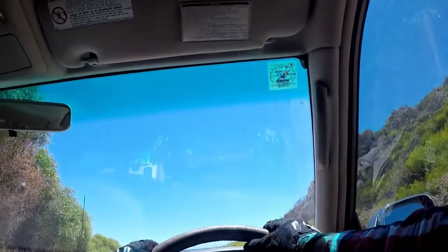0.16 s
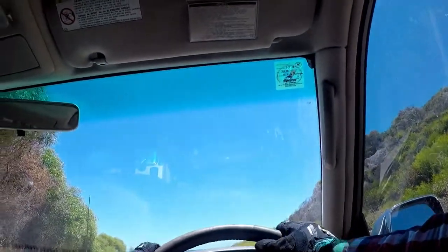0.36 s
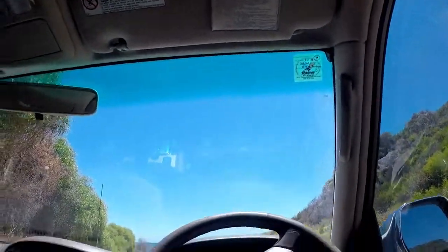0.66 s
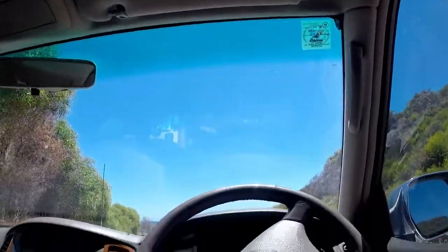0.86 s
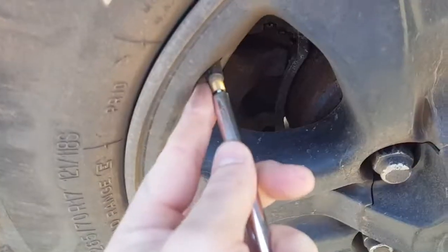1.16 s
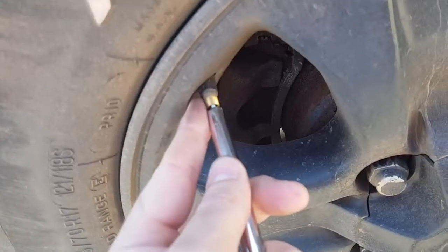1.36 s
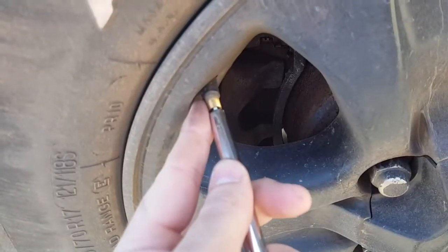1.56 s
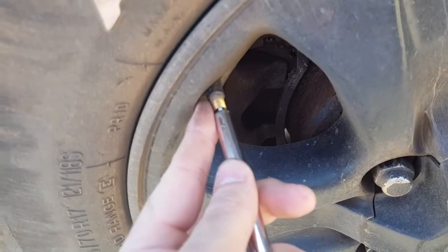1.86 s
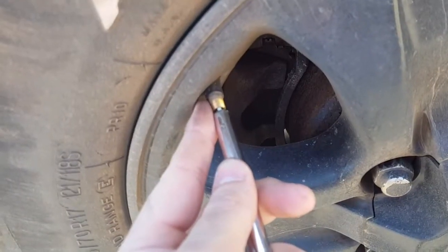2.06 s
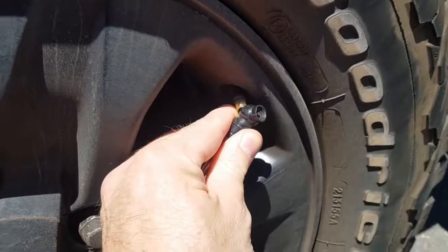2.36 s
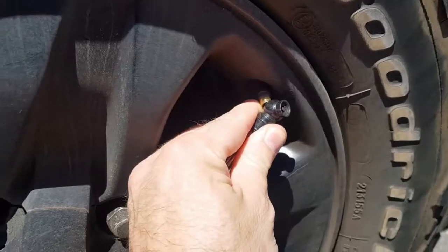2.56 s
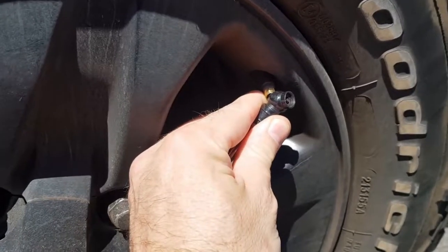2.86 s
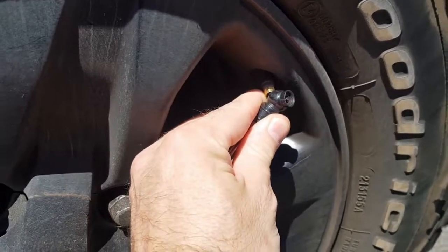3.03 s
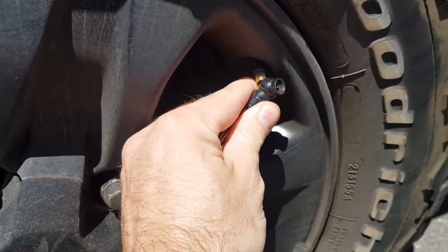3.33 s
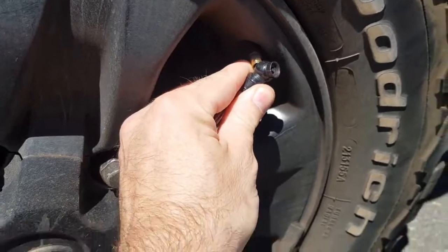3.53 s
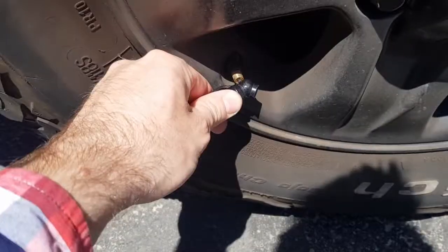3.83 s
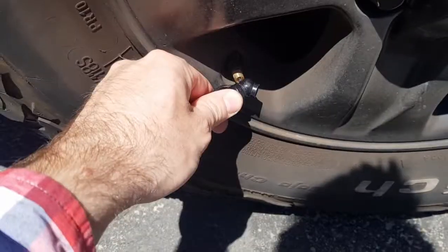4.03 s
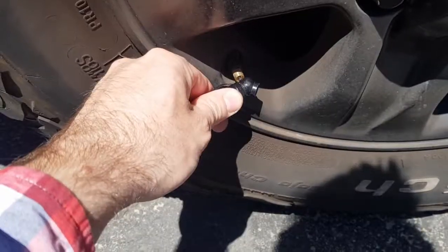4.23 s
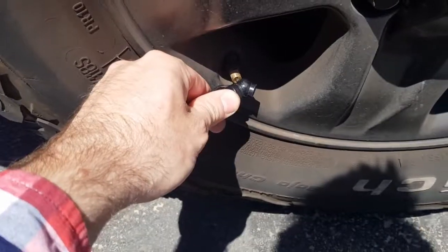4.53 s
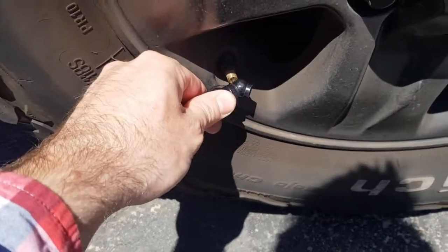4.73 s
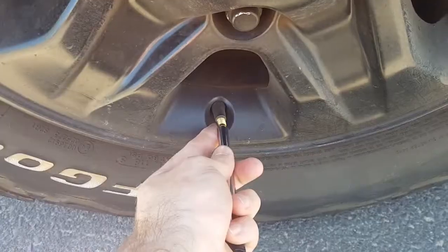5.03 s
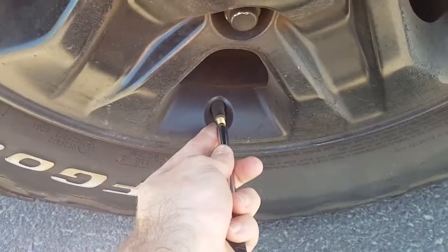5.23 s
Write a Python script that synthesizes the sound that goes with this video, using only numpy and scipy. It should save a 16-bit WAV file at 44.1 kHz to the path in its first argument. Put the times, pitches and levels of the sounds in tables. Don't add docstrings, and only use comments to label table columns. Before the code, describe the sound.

Muffled low engine rumble with several bumps and short plastic rattles, heard from inside the cab on a stereo camera microphone. Then sudden, continuous, sharp air hiss from a deflating tyre, recorded very close in open air. It runs to the end in four shots split by tiny silent dips, each a little different in tone and stereo spread, over light wind rumble.

```python
import sys
import numpy as np
from scipy import signal
from scipy.fft import rfft, irfft, next_fast_len
from scipy.io import wavfile
from scipy.ndimage import uniform_filter1d, map_coordinates

SR = 44100
rng = np.random.default_rng(int(sys.argv[2]) if len(sys.argv) > 2 else 0)


def materialize(psi):
    bounded = np.clip(np.atleast_2d(psi).T, -1, 1)
    quanta = np.round(bounded * 32767).astype(np.int16)
    wavfile.write(sys.argv[1], SR, quanta)


def volts(x):
    e = np.asarray(x, float) / 20
    return 10 ** e


N = 237654

CUTS = [
    1.0844,
    2.353,
    3.6212,
    4.888,
]


def unit(x):
    return x / np.sqrt(np.mean(x ** 2) + 1e-20)


def along(points, hz):
    f, v = np.transpose(points)
    return np.interp(np.log(hz + 1), np.log(f + 1), v)


def curves(rows):
    s, *cols = np.transpose(rows)
    return [np.interp(np.arange(N) / SR, s, c) for c in cols]


def wobble(rate):
    knots = rng.standard_normal(int(N * rate / SR) + 4)
    return map_coordinates(knots, [np.arange(N) * rate / SR])


def filtered(x, response):
    m = next_fast_len(N + SR // 4)
    return irfft(rfft(x, m) * response(np.fft.rfftfreq(m, 1 / SR)), m)[..., :N]


def noise_pair(alike, patchy_db):
    z = signal.stft(rng.standard_normal((2, N)), nperseg=256)[2]
    patches = uniform_filter1d(rng.standard_normal(z.shape[1:]), size=4, axis=0)
    patches = uniform_filter1d(patches, size=20, axis=1)
    pair = signal.istft(z * volts(patchy_db * unit(patches)), nperseg=256)[1][:, :N]

    def mid_side(hz):
        angle = np.arccos(np.clip(along(alike, hz), -1, 1)) / 2
        return np.array([np.cos(angle), np.sin(angle)])

    mid, side = filtered(pair, mid_side)
    return np.array([mid + side, mid - side])


def between(start, end):
    t = np.arange(N) / SR
    return np.clip((t - start) / 0.0013, 0, 1) * np.clip((end - t) / 0.0024, 0, 1)


def cab():
    # start_s, boom_db, body_db, creak_db, grit_db
    road_levels = [(0.0, -22.5, -43, -50, -50), (0.008, -25.5, -42, -54.5, -60.5),
                   (0.33, -29, -43, -60, -73), (0.436, -21.5, -41, -53, -55.5),
                   (0.486, -25.5, -38, -52.5, -55), (0.628, -18.5, -40, -48, -53.5),
                   (0.676, -22, -34.5, -46.5, -50), (0.866, -24, -42, -52, -53.5),
                   (0.974, -20.5, -49, -51, -50.5), (1.024, -31.5, -40, -49, -51.5),
                   (1.076, -22.5, -37, -50, -54), (1.08, -24, -50, -48, -50)]
    # start_s, pitch_hz, level_db
    firing_curve = [(0.0, 46.35, -27), (0.14, 45.4, -25.5), (0.182, 46.1, -30), (0.212, 46.55, -26),
                    (0.574, 46.93, -27), (0.592, 46.65, -25.5), (0.742, 46.14, -30), (1.08, 46.94, -25)]
    # freq_hz, level_db_per_hz
    boom_colour = [(8.8, -40), (15, -4), (37, -2.5), (54, -1.5), (70, -3.5), (113, -1), (173, -9.5),
                   (209, -19), (300, -25), (390, -47), (660, -120)]
    body_colour = [(110, -34.5), (180, -1.5), (209, -11.5), (361, -9.5), (402, -13), (646, -11),
                   (801, -24.5), (898, -17.5), (1000, -22), (1300, -57), (2200, -120)]
    creak_colour = [(500, -45), (850, -14), (1110, -7), (1190, -8), (1830, -10.5), (2940, -16), (3200, -26),
                    (4160, -48), (7040, -120)]
    grit_colour = [(1650, -45), (2800, -17.5), (3300, -5), (3800, -8.5), (4200, -8), (4900, -12.5),
                   (5800, -7), (6600, -11.5), (7400, -15), (10000, -24), (13000, -40), (15500, -60)]
    draught_colour = [(1000, -10.5), (2500, -5), (6000, -1), (10500, -5), (13000, -9), (15500, -32)]
    # freq_hz, left_right_likeness (0-1)
    cab_alike = [(40, 0.98), (120, .9), (250, 1), (690, 0.51), (1030, 0.42), (3100, 0.64), (3790, 0.97),
                 (5860, 0.52), (6550, .05), (11020, 1), (11710, .35), (14130, .1)]
    # freq_hz, left_minus_right_db
    cab_lean = [(60, 0), (130, -1.5), (290, -6), (640, -3.5), (1410, -1.5), (3100, 1.5), (6820, -1),
                (15000, 1)]

    boom_db, body_db, creak_db, grit_db = curves(road_levels)
    pitch_hz, firing_db = curves(firing_curve)
    phase = 2 * np.pi * np.cumsum(pitch_hz * (1 + 0.031 * wobble(14.4))) / SR
    firing = volts(firing_db + 1.5 + 1.2 * wobble(12)) * np.sin(phase)
    once_a_cycle = 1 + 0.17 * np.cos(phase)
    out = firing + jolts()
    layers = [
        (boom_db - 2, boom_colour, 0.8),
        (body_db - 1.5, body_colour, 0.8),
        (creak_db, creak_colour, 1.5),
        (grit_db - 1, grit_colour, 1.2),
        (-62, draught_colour, 0.5),
    ]
    for level_db, colour, lumps_db in layers:
        layer = filtered(noise_pair(cab_alike, patchy_db=1.5), lambda f: volts(along(colour, f)))
        out = out + volts(level_db) * unit(layer * once_a_cycle * volts(lumps_db * wobble(25.5)))
    return filtered(out, lambda f: volts(np.outer([0.5, -0.5], along(cab_lean, f))))


def jolts():
    # start_s, peak_db, thump_db, most_shaken_hz, tick_db, t60_s
    bumps = [
        (.114, -39, -4, 1900, -9, .03),
        (.391, -34, 6, 400, -24, .05),
        (.524, -39, 4, 500, -20, .05),
        (.54, -39, 2, 700, -8, .03),
        (.582, -17, 1, 300, -40, .05),
        (.645, -30, 2, 700, -20, .04),
        (.686, -20, -3, 480, -31, .065),
        (.751, -23.5, -14, 560, -21, .08),
        (.937, -26, -5, 400, -27, .08),
        (1.049, -35, 2, 600, -24, .05),
    ]
    # freq_hz, level_db
    trim_modes = [(240, -2), (310, 0), (410, -4), (500, -1), (560, 0), (680, -5), (910, -2), (1110, -2),
                  (1410, -4), (1770, -6), (2060, -6)]

    knock, tick = np.zeros((2, N)), np.zeros(N)
    t = np.arange(SR // 5) / SR
    for s, peak_db, thump_db, shaken_hz, tick_db, t60 in bumps:
        at = slice(round(s * SR), round(s * SR) + len(t))
        fade = volts(peak_db - 60 * t / max(t60, 0.01)) * (1 - np.exp(-t / 0.004))
        knock[:, at] += fade * volts(thump_db) * np.sin(2 * np.pi * 165 * t)
        for hz, mode_db in trim_modes:
            reach_db = mode_db - 7 * abs(np.log2(hz / shaken_hz)) + rng.normal(0, 1.5, size=(2, 1))
            turns = hz * t + 0.11 * rng.standard_normal((2, 1))
            knock[:, at] += fade * volts(reach_db) * np.sin(2 * np.pi * turns)
        tick[at] += fade * volts(tick_db - 4) * rng.standard_normal(len(t))
    bright = lambda f: (1j * f * 4000 / (4500 ** 2 - f * f + 1j * f * 4000)) ** 2
    return knock + filtered(tick, bright)


def valve(wheel):
    # start_s, jet_db, body_db
    flow = [
        [(1.11, -18.5, -8.5), (1.132, -18.5, -9), (2.272, -20, -9.5), (2.32, -20.5, -10)],
        [(2.38, -19, -8.5), (3.524, -18.5, -9), (3.59, -20, -7.5)],
        [(3.65, -18, -9.5), (3.834, -18.5, -9), (4.818, -19, -8), (4.86, -17.5, -8.5)],
        [(4.92, -18, -13), (5.016, -19.5, -11), (5.37, -18.5, -11)],
    ]
    # freq_hz, level_db_per_hz
    jet_colour = [([(340, -29.5), (1890, -23.1), (4130, -14.0), (5000, -15.5), (7750, -25.5), (8100, -38),
                  (9470, -10.5), (9990, -27), (10850, -20.3), (12750, -10), (13090, -10), (15680, -17.5)],
                  [(340, -27.5), (1380, -27), (2240, -27), (5170, -8.2), (5860, -3.5), (7060, -10.5),
                  (8270, -8.5), (10510, -5), (11710, 3), (12400, 2.7), (14130, -2), (15680, -17)]),
                  ([(340, -33.5), (690, -19.5), (1030, -24.5), (2760, -12), (3790, -13), (4650, -9.5),
                  (7410, -28), (8270, -27), (8790, -21.3), (9300, -22), (10160, -15.5), (15680, -13)],
                  [(340, -29.5), (1380, -26.5), (3960, -10), (5510, -7.5), (6030, -5), (6890, -14),
                  (7750, -15.5), (9300, -10.5), (13090, 4.5), (14130, -2.6), (15330, -8), (15680, -23)]),
                  ([(340, -31.5), (3620, -13.5), (4650, -14), (8100, -32), (8440, -25.6), (9300, -20),
                  (9990, -28), (11200, -14), (12230, -9), (12580, -30), (13440, -11), (15680, -13)],
                  [(340, -31), (860, -30), (1210, -23), (1890, -28), (4130, -10.5), (5170, -10),
                  (7580, -17.5), (8440, -7), (11020, 1.65), (11890, 2.6), (12920, -2), (15680, -13)]),
                  ([(340, -26.5), (1030, -30.5), (1890, -24.5), (4310, -18.5), (4650, -19), (7920, -31),
                  (8270, -22), (9130, -23), (10680, -7), (11370, -25), (12580, -8.5), (15680, -15)],
                  [(340, -31), (1030, -32.5), (1550, -27), (2070, -30.5), (5170, -13), (5680, -15),
                  (6030, -9), (7240, -19), (7580, -12.5), (9990, -3.5), (14130, -1.5), (15680, -8)])]
    # delay_ms, gain
    near_echoes = [([(0.63, -0.076), (0.81, -0.07), (1.23, 0.079), (1.28, -0.035), (1.34, 0.08),
                   (1.99, 0.071), (2.06, -0.063)], [(0.63, 0.059), (0.76, 0.07), (0.87, 0.0039),
                   (0.98, 0.0063), (1.42, 0.092), (1.53, 0.075), (1.59, -0.033)]), ([(0.53, 0.021),
                   (0.62, -0.018), (1.19, -0.088), (1.78, -0.0042), (1.85, 0.047), (1.99, 0.074),
                   (2.27, -0.081)], [(0.56, -0.016), (0.71, 0.048), (1.35, 0.063), (1.56, 0.043),
                   (1.67, 0.04), (2.02, -0.051), (2.2, -0.057)]), ([(0.5, -0.12), (0.72, 0.077),
                   (0.8, -0.053), (1.0, 0.079), (1.4, -0.06), (1.52, -0.068), (2.05, 0.087)],
                   [(0.86, -0.053), (1.35, -0.086), (1.42, -0.031), (1.84, -0.017), (1.98, -0.04),
                   (2.29, -0.098), (3.08, -0.073)]), ([(1.03, 0.095), (1.13, -0.06), (1.23, -0.082),
                   (1.45, 0.073), (1.58, 0.068), (1.74, 0.065), (2.24, 0.092)], [(0.55, -0.051),
                   (0.64, -0.059), (0.88, -0.079), (0.96, -0.03), (1.17, -0.06), (1.25, -0.037),
                   (2.72, -0.11)])]
    # freq_hz, left_right_likeness (0-1)
    jet_alike = [
        [(340, 0.27), (2410, 0.23), (2760, 1), (3100, 0.97), (3790, 0.48), (4130, 0.65), (7920, 0.23),
         (8270, 0.22), (13090, 0.46), (14470, 0.11), (14810, 0.2), (15500, 0.28)],
        [(340, 0.39), (690, 0.72), (1380, 0.56), (1720, 0.058), (3100, 0.99), (3790, 1), (4480, 0.65),
         (4820, 0.49), (7240, 0.11), (12060, 0.29), (15160, 0.06), (15500, 0.25)],
        [(340, 0.5), (690, 0.56), (1030, 0.85), (1380, 0.41), (1720, 0.3), (2760, 0.96), (3100, 0.86),
         (4130, 0.55), (7580, 0.034), (10340, 0.35), (10680, 0.75), (15500, 0.47)],
        [(340, 0.57), (1030, 0.43), (1380, 0.66), (1720, 0.32), (6200, 0.75), (7240, 0.19), (7580, 0.08),
         (11020, 0.9), (11370, 0.5), (11710, 0.24), (14810, 0.18), (15500, 0.34)],
    ]
    # freq_hz, phase_rad
    port_lag = [
        [(340, -0.8), (3450, -0.4), (5510, -1.5), (6890, -4.5), (8610, 2), (8960, -6), (12060, -10),
         (13090, -10.5), (14130, -15.5), (15500, -9)],
        [(340, 0.4), (4130, -0.87), (5510, -0.6), (6200, -0.3), (6890, -2.5), (9990, -16.5), (10340, -10.65),
         (11370, -12), (12750, -10.5), (15500, -12.5)],
        [(340, 0.02), (9300, -0.45), (11370, 1), (11710, 0.77), (12060, 0.17), (13780, -1.1), (14470, -1.3),
         (14810, -2.2), (15160, -1.7), (15500, -1.2)],
        [(340, 0.4), (4820, -0.6), (5510, -2.2), (5860, 1), (6200, -5.5), (7240, -7), (7580, -7.5),
         (14470, -17), (14810, -33), (15500, -19.5)],
    ]

    jet_db, body_db = curves(flow[wheel])
    colour, echoes = jet_colour[wheel], near_echoes[wheel]

    def ports(hz):
        left = port(colour[0], echoes[0], hz)
        right = port(colour[1], echoes[1], hz) * np.exp(1j * along(port_lag[wheel], hz))
        return np.array([left, right])

    air = filtered(noise_pair(jet_alike[wheel], patchy_db=0.6), ports)
    body = filtered(air, lambda hz: 1 / (1 + (hz / 7500) ** 8))
    jet = air - body
    unsteady = volts(0.13 * wobble(7) + 0.27 * wobble(30))
    hiss = body * volts(body_db - body_db.mean()) + jet
    return volts(jet_db) * unsteady * hiss / jet.mean(axis=0).std()


def port(colour, echoes, hz):
    late = np.c_[rng.uniform(2.5, 9, size=14), 0.03 * rng.standard_normal(size=14)]
    comb = sum(gain * np.exp(-2j * np.pi * hz * ms / 1000) for ms, gain in [*echoes, *late])
    low_cut_db = 20 * np.log2(np.maximum(340 / (hz + 1), 1))
    return volts(along(colour, hz) - low_cut_db) * np.exp(comb)


def wind(shot):
    # start_s, buffet_db, left_minus_right_db
    gusts = [
        [(1.09, -42, -3), (1.116, -48.5, 10), (1.186, -47.5, 15.5), (1.24, -46, 5), (1.302, -46, 1.0),
         (1.652, -52.5, 14), (1.766, -46, 13.5), (1.958, -49.5, 4.5), (2.022, -48, 10.5), (2.154, -39.5, 6),
         (2.302, -42.5, -9), (2.345, -39.5, -4.5)],
        [(2.36, -54, 3), (2.404, -63, 5), (2.44, -53, 3), (2.722, -60, 7), (2.802, -54.5, -1.5), (2.95, -59, 5),
         (2.984, -64.5, -0.5), (3.068, -52, 0.5), (3.128, -61, 7), (3.176, -53.5, 2), (3.602, -60, 4.5),
         (3.615, -59, 6)],
        [(3.63, -59, 2.5), (3.712, -73, 2), (3.772, -51.5, -11), (3.844, -72.5, 6.5), (3.878, -56.5, 3.5),
         (3.982, -75, 2), (4.016, -56, 1), (4.104, -64.5, 3), (4.246, -57, -2.0), (4.324, -62, 0),
         (4.618, -62.5, -2.0), (4.818, -62, 7), (4.97, -67, -2), (5.074, -63, -2), (5.26, -66.5, 3),
         (5.389, -60, -2)],
    ]
    # freq_hz, level_db_per_hz
    buffet_colour = [
        [(8.8, -44), (15, -11), (43, 0.5), (101, 3), (159, -3), (320, -20.5), (390, -27), (450, -25),
         (580, -42), (990, -120)],
        [(8.8, -47), (15, -13.5), (48, -7), (70, -3), (123, -3), (153, -2), (231, -9.5), (289, -9), (364, -30),
         (450, -12.5), (580, -35.5), (990, -120)],
        [(8.8, -49), (15, -19), (27, -4), (97, 4.5), (281, -4.5), (339, -17.5), (419, -60), (450, -14),
         (580, -17), (990, -120)],
    ]
    # freq_hz, level_db_per_hz
    flap_colour = [(60, -26), (150, -3), (300, -0.5), (450, -12), (700, -16), (1200, -90)]

    level_db, pan_db = curves(gusts[shot])
    port_db = level_db + np.outer([0.5, -0.5], pan_db)
    lumps = volts(1.1 * np.array([wobble(25), wobble(25)]))

    def turbulence(colour):
        noise = noise_pair([(30, 0.17)], patchy_db=0.55)
        return unit(lumps * filtered(noise, lambda f: volts(along(colour, f))))

    buffet = turbulence(buffet_colour[shot]) * volts(port_db + 3.5)
    flap = turbulence(flap_colour) * volts(-43.5 + 2.2 * (port_db + 39))
    return buffet + flap


def far_engines():
    # wheel (0-3), pitch_hz, width_hz, level_db
    hums = [
        (0, 605, 60, -56.5),
        (1, 79, 5.8, -61),
        (1, 154.2, 7.8, -57.5),
        (1, 651, 60, -56.5),
        (3, 500, 12, -57.5),
    ]

    edits = [*CUTS, 9]
    out = 0
    for wheel, hz, width, level_db in hums:
        noise = noise_pair([(30, 0.93)], patchy_db=0)
        hum = unit(filtered(noise, lambda f: 1 / (1 + ((f - hz) / width) ** 2)))
        k = round(wheel)
        out = out + volts(level_db) * hum * between(edits[k], edits[k + 1])
    return out


def scene():
    ends = [*CUTS[1:], 9]
    out = cab() * between(-1, CUTS[0]) + far_engines()
    for wheel in range(4):
        out += valve(wheel) * between(CUTS[wheel], ends[wheel])
    for shot, end in enumerate([CUTS[1], CUTS[2], 9]):
        out += wind(shot) * between(CUTS[shot], end)
    return out


def camera_masking(x):
    # freq_hz, step_db re masking level
    coarseness = [(150, -4), (700, -3), (1500, -1), (2300, 1), (3500, 3), (5000, 1), (7500, 0), (10000, -2),
                  (12500, -4), (15500, 1)]
    hop, offset, top_bin = 1024, 632, 736

    n, k = np.arange(2 * hop)[:, None] + 0.5, np.arange(top_bin) + 0.5
    window = np.sin(np.pi * n / (2 * hop))
    basis = np.sqrt(2 / hop) * window * np.cos(np.pi / hop * (n + hop / 2) * k)
    padded = np.pad(x, ((0, 0), (2 * hop - offset, 3 * hop)))
    at = hop * np.arange(N // hop + 3)[:, None] + np.arange(2 * hop)
    hz, band = k * SR / (2 * hop), np.arange(top_bin) // 8

    def band_db(z):
        power = (z ** 2).reshape(*z.shape[:2], -1, 8).mean(axis=-1)
        return 10 * np.log10(power + 1e-12)[..., band]

    def turned(z):
        return np.array([z[0] + z[1], z[0] - z[1]]) / np.sqrt(2)

    ports = padded[:, at] @ basis
    sum_db, difference_db = band_db(turned(ports))
    joint = uniform_filter1d(sum_db - difference_db, size=32) > 4
    lines = np.where(joint, turned(ports), ports)
    own_db = np.where(joint, band_db(lines)[0] - 1, band_db(lines))

    treble_db = 10 * np.log10(np.mean(ports[..., hz > 2500] ** 2, axis=(0, 2)) + 1e-12)
    attack = treble_db - np.roll(treble_db, 2) > 20
    frame_power = np.mean(ports ** 2, axis=(0, 2)) + 1e-12
    unheard_db = -56.5 + 5 * np.log10(frame_power)[:, None] - 30 * attack[:, None]
    own = 0.45 + 0.5 / (1 + (hz / 1800) ** 4)
    masking_db = own * own_db + (1 - own) * (treble_db - 60 * attack)[:, None]
    chance = rng.standard_normal((3, len(at), top_bin // 8))
    scatter_db = (3 * unit(uniform_filter1d(chance[2], size=5, axis=0)) + 2 * chance[:2])[..., band]
    step = volts(np.maximum(along(coarseness, hz) + masking_db, unheard_db) + scatter_db)

    whole = np.floor((np.abs(lines) / step) ** 0.75 + 0.4054)
    lines = np.sign(lines) * step * whole ** (4 / 3)
    lines[:, attack] *= np.clip((hz[-1] - hz) / 900, 0, 1)
    frames = np.where(joint, turned(lines), lines) @ basis.T
    out = np.array([np.bincount(at.ravel(), f.ravel()) for f in frames])
    return out[:, 2 * hop - offset:][:, :N]


def low_pass(x):
    return signal.sosfilt(signal.butter(12, 16750, fs=SR, output="sos"), x)


def record(dry):
    limited = dry / (1 + np.abs(dry / 1.1) ** 4) ** 0.25
    mix = camera_masking(limited)
    return low_pass(mix)


dry = scene()
out = record(dry)
materialize(out)
```